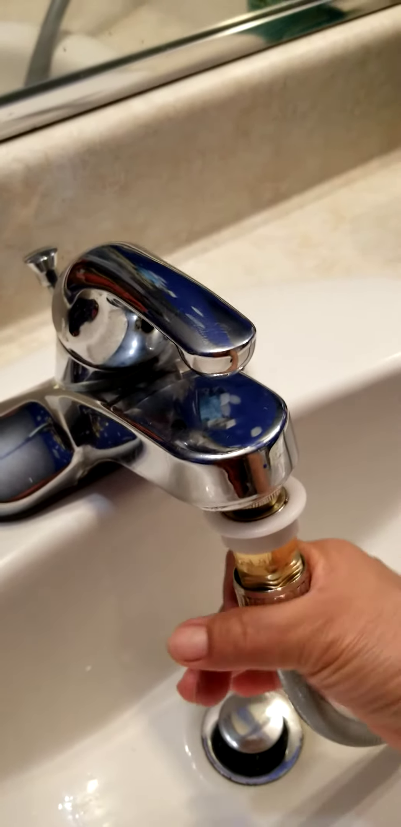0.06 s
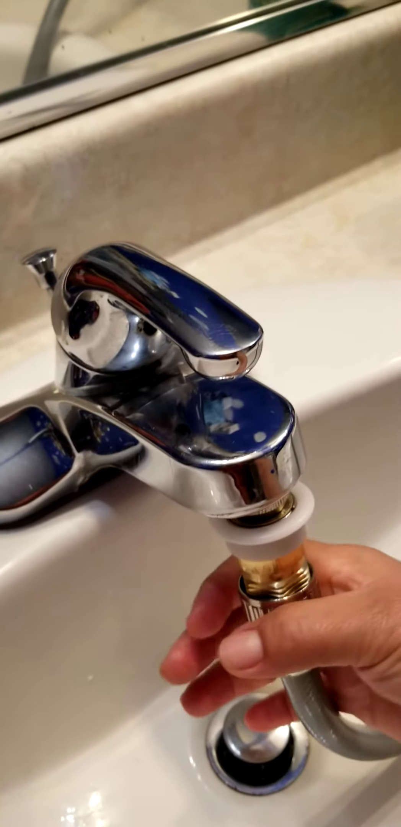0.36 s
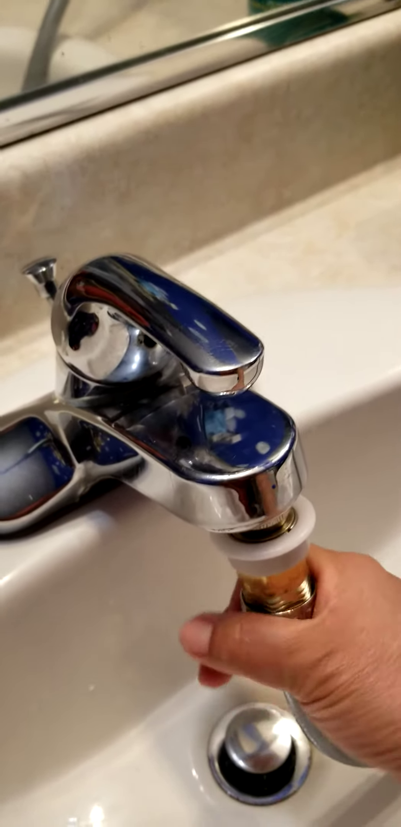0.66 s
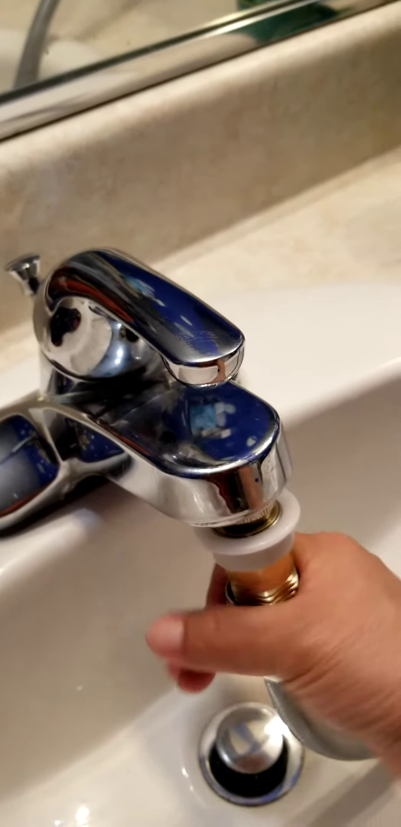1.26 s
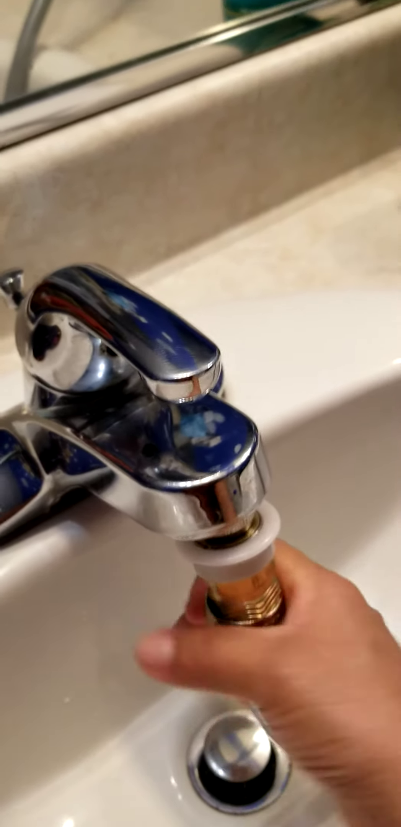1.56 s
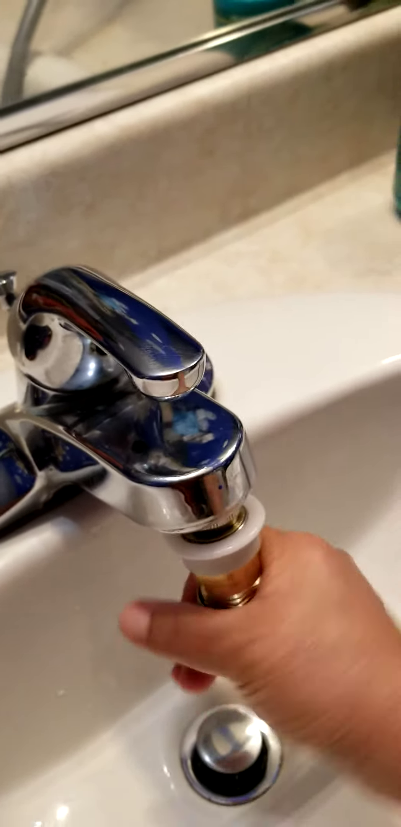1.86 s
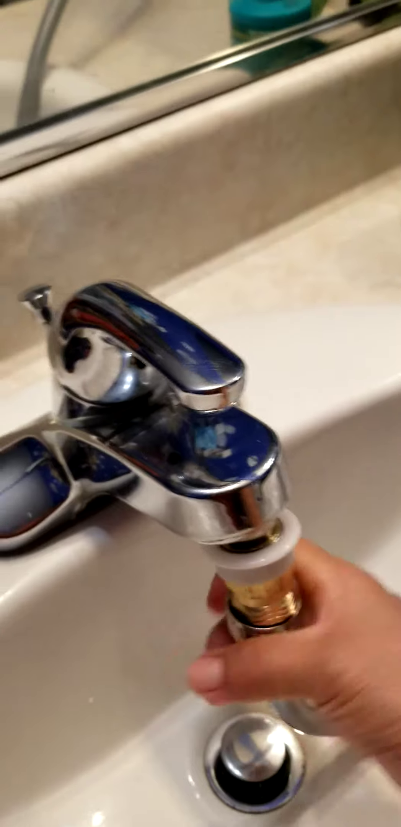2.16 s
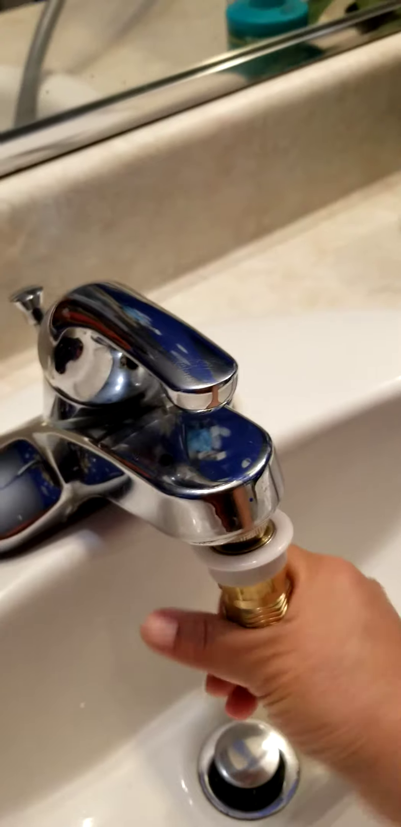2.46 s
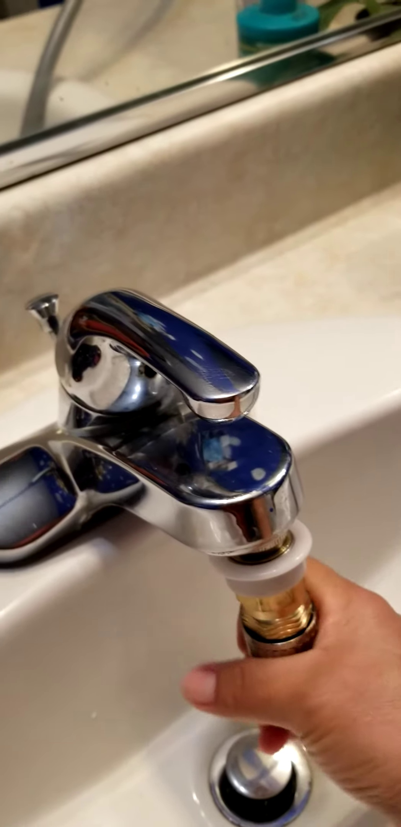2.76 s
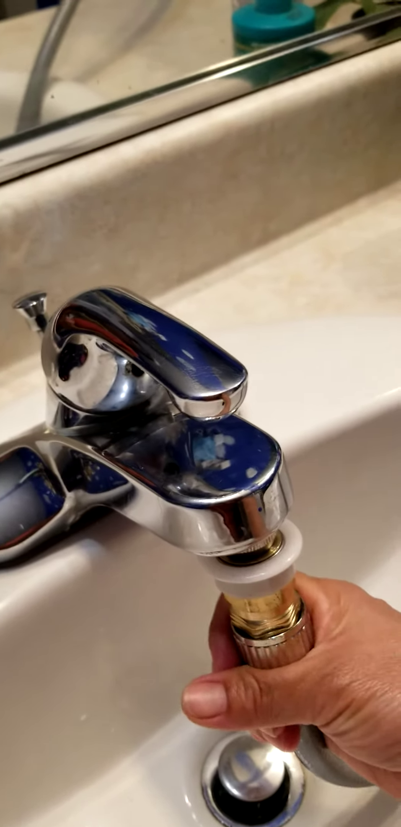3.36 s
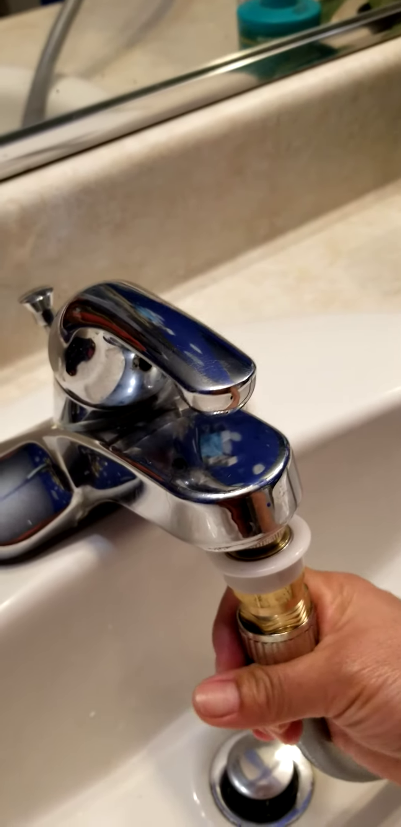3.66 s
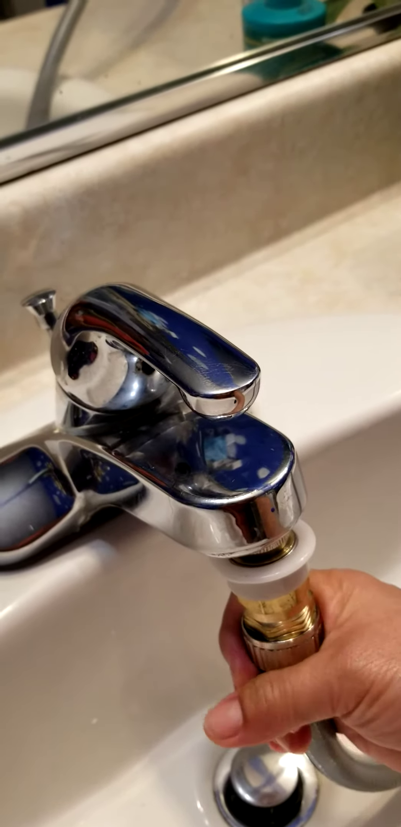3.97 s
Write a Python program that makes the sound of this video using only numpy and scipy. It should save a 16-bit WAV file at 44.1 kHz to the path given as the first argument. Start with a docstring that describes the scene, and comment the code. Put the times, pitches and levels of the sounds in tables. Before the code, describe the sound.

Light metal clicks and one sharp snap as a hand twists a hose fitting on a faucet.

```python
"""Hose coupling on a bathroom faucet

A hand works a brass hose coupling, close by, in a small hard room. The collar rubs on its thread,
clicks against the spout, squeaks once, and once slips with a sharp snap. Each contact also thuds
through the faucet into the basin. The hose rumbles as it is moved, over a faint hum and hiss."""
import sys
import numpy as np
from scipy import signal
from scipy.fft import rfft, irfft
from scipy.io import wavfile

SR = 44100
rng = np.random.default_rng(int(sys.argv[2]) if len(sys.argv) > 2 else 0)


def to_wav(sig):
    """Store sig (one row per channel, or 1-D mono) as 16-bit WAV at the path in sys.argv[1].

    Samples outside -1..1 are clipped; the rate is SR.
    """
    pcm = np.clip(np.atleast_2d(sig), -1, 1) * 32767
    pcm = np.round(pcm).astype(np.int16)
    wavfile.write(sys.argv[1], SR, pcm.T)  # frames by channels


N = 176400
TIME = np.arange(N) / SR


def from_db(db):
    """Turn decibels into a gain."""
    return 10 ** (np.asarray(db) / 20)


def at_hz(points, hz):
    """Read between the rows of a (pitch, value) table, on a musical pitch scale."""
    table = np.array(points)
    return np.interp(np.log(np.maximum(hz, 1)), np.log(table[:, 0]), table[:, 1])


def unit_energy(x):
    """Scale a short sound to a total energy of one."""
    return x / np.sqrt(np.sum(x ** 2) + 1e-20)


def unit_rms(x):
    """Scale a long sound to an average power of one."""
    return x / np.sqrt(np.mean(x ** 2) + 1e-20)


def butter(x, hz, kind, order=2):
    """Keep the "low" or the "high" side of a pitch."""
    return signal.sosfilt(signal.butter(order, hz, kind, fs=SR, output="sos"), x)


def band(x, hz, width_hz):
    """Keep the sound near one pitch by passing it twice through a resonance."""
    r = np.exp(-np.pi * width_hz / SR)
    b, a = [1, 0, -1], [1, -2 * r * np.cos(2 * np.pi * hz / SR), r * r]
    return signal.lfilter(b, a, signal.lfilter(b, a, x))


def colour(x, points):
    """Shape the tone with a (pitch, level) table."""
    n = x.shape[-1]
    gain = from_db(at_hz(points, np.fft.rfftfreq(n, 1 / SR)))
    cepstrum = irfft(np.log(gain), n)
    cepstrum[1:n // 2] *= 2  # folded so that the filter rings after a hit, not before
    cepstrum[n // 2 + 1:] = 0
    return irfft(rfft(x) * np.exp(rfft(cepstrum)), n)


def pan(db):
    """Left and right gains; above zero leans left."""
    return from_db([[db / 2], [-db / 2]])


def add(track, start_s, sound):
    """Mix a sound in at a given time."""
    start = int(start_s * SR)
    track[..., start:start + sound.shape[-1]] += sound[..., :N - start]


def dying_tone(hz, fade_s):
    """One second of a pure tone that drops 60 dB in fade_s."""
    return from_db(-60 * TIME[:SR] / fade_s) * np.sin(2 * np.pi * hz * TIME[:SR])


def chatter(decay_s, rise_s=0.00043, size=4096):
    """The brief rattle of two surfaces meeting, equally strong at all pitches."""
    t = TIME[:size]
    burst = rng.standard_normal(size) * (1 - np.exp(-t / rise_s)) * np.exp(-t / decay_s)
    spectrum = rfft(burst, 2 * size)
    return irfft(spectrum / np.abs(spectrum))[:size] * np.exp(-t / (10 * decay_s))


# How alike left and right are: pitch_hz, likeness (1 = the same)
STEREO_LIKENESS = [(110, 1), (250, 0.89), (500, 0.43), (1200, -0.18), (4000, -0.024)]

def wide_noise(size):
    """Noise from all around: alike in both ears in the bass, unrelated in the treble."""
    mid, side = rfft(rng.standard_normal((2, size)))
    alike = at_hz(STEREO_LIKENESS, np.fft.rfftfreq(size, 1 / SR))
    return irfft(mid * np.sqrt((1 + alike) / 2) + side * np.sqrt((1 - alike) / 2) * [[1], [-1]], size)


# Thin, high whines: pitch_hz, level_db
WHINES = [(9120, -80.5), (13880, -85.5)]
# Tone of the hiss: pitch_hz, boost_db
HISS_TONE = [(700, 4.5), (1500, -2), (5500, -3.5), (7500, -0.5), (9700, 2), (11000, 1), (12500, -1),
             (16000, -2.5)]

def background(hum_hz=119.07, hum_db=-55.5, hiss_db=-70.5):
    """A low hum, thin whines and a faint hiss, all made of filtered noise."""
    hum = unit_rms(band(rng.standard_normal(N), hum_hz, width_hz=3.75))
    whines = sum(from_db(db) * unit_rms(band(rng.standard_normal((2, N)), hz, width_hz=190))
                 for hz, db in WHINES)
    hiss = unit_rms(colour(wide_noise(N), HISS_TONE))
    return from_db(hum_db) * hum + whines + from_db(hiss_db) * hiss


# The room's echo: pitch_hz, fade_s (time to drop 60 dB), level_db
ROOM_ECHO = [(80, 0.4, -3), (485, 1, 1), (695, 0.43, 8.5), (1110, 0.38, 2), (3500, 0.35, 0),
             (7500, 0.38, 0), (14000, 0.28, 1.5)]

def bathroom(x):
    """Dense echoes off close, hard walls; each pitch range fades at its own speed."""
    noise, t = rfft(wide_noise(SR)), TIME[:SR]
    hz, tail = np.fft.rfftfreq(SR, 1 / SR), 0
    onset = np.clip(t / 0.00043, 0, 1)
    for k, (_, fade_s, level_db) in enumerate(ROOM_ECHO):
        share = at_hz([(row[0], j == k) for j, row in enumerate(ROOM_ECHO)], hz)  # this row's range
        fade = unit_energy(onset * from_db(-60 * t / fade_s))
        tail = tail + from_db(level_db) * irfft(noise * share) * fade
    return signal.fftconvolve(x[None], tail, axes=1)[:, :N]


# Loudness of the handling, before the trims below: time_s, rumble_db, shuffle_db
HANDLING = [(0, -48.5, -53), (0.202, -54, -57.5), (1.1, -52.5, -59), (1.247, -45.5, -52), (1.5, -50, -54),
            (1.7, -52, -57), (1.879, -43, -45.5), (2.05, -82, -57), (2.3, -61, -56), (2.482, -48, -42.5),
            (2.699, -52.5, -54), (2.92, -49, -58), (3.12, -45, -55), (3.35, -45.5, -55),
            (3.65, -42.5, -48.5), (3.85, -57.5, -60.5), (4, -57, -62.5)]
# Tone of the hose: pitch_hz, boost_db
RUMBLE_TONE = [(22, -33.5), (45, -17), (70, -9), (98, -2.5), (135, -3), (190, -17.5), (400, -54)]
# Tone of the fingers: pitch_hz, boost_db
SHUFFLE_TONE = [(80, 4.5), (160, -3.5), (280, -0.5), (470, -1), (640, -13.5), (1000, -20), (1600, -47.5),
                (5000, -53.5)]
FAUCET_PAN_DB = -3.5

def handling(rumble_trim_db=-3, shuffle_trim_db=-1):
    """The hose rumbles and the fingers shuffle on the coupling."""
    time_s, rumble_db, shuffle_db = np.transpose(HANDLING)
    rumble_gain = from_db(np.interp(TIME, time_s, rumble_db) + rumble_trim_db)
    shuffle_gain = from_db(np.interp(TIME, time_s, shuffle_db) + shuffle_trim_db)
    rumble = rumble_gain * unit_rms(colour(wide_noise(N), RUMBLE_TONE))
    shuffle = shuffle_gain * unit_rms(colour(wide_noise(N), SHUFFLE_TONE))
    return rumble + pan(FAUCET_PAN_DB) * shuffle


# The hose bumps and swings: start_s, pitch_hz, strength_db, decay_s
HOSE_BUMPS = [(1.156, 91, -29, 0.031), (1.226, 85.6, -25, 0.015), (1.368, 101.1, -38.5, 0.12),
              (2.085, 138.3, -35.5, 0.06), (2.758, 53.3, -39, 0.078), (2.943, 60, -26.5, 0.025),
              (2.973, 135, -28, 0.037), (3.442, 126.5, -30.5, 0.04), (3.477, 94, -28, 0.028),
              (3.618, 137.3, -33, 0.051), (3.64, 98.3, -41.5, 0.12)]

def hose_bumps(rise_s=0.0077):
    """The hose tugs at the faucet, making low booms that die quickly."""
    out, t = np.zeros(N), TIME[:SR]
    for start_s, hz, strength_db, decay_s in HOSE_BUMPS:
        swell = (1 - np.exp(-t / rise_s)) * np.exp(-t / decay_s)
        add(out, start_s, from_db(strength_db) * swell * np.sin(2 * np.pi * hz * t))
    return out


# Dull thuds through the faucet, from handling, a hard click and the snap:
# start_s, strength_db, pitch_hz
DULL_THUDS = [(0.2211, -21.5, 248), (0.539, -26.5, 297), (.795, -22, 300), (1.111, -24.5, 332),
              (1.478, -26.5, 320), (1.851, -23, 300), (2.071, -7.5, 203), (2.399, -18, 326),
              (2.9419, -2, 610), (3.356, -15.5, 256)]
# Notes at which faucet and basin ring: pitch_hz, boost_db, fade_s, pan_db
BASIN_NOTES = [(73.7, -37.5, 0.22, -2), (103, -44.5, 0.69, -0.5), (135, -30.5, 0.43, 1),
               (167.2, -38, 0.33, -3.5), (235.6, -40.5, 0.51, -6), (283.04, -29, 0.34, 0),
               (372.4, -32.5, 0.43, -3.5), (426.7, -30.5, 0.12, 4), (479.7, -31, 0.15, -12.5)]

def thuds(contact_hz=311, width_ratio=1.73, thump_trim_db=-4.5):
    """Handling and metal contacts (see CONTACTS) push on the faucet: it thumps and the basin rings."""
    thumps, ringing = np.zeros(N), np.zeros((2, N))
    contact_thuds = [(start_s, thud_db, contact_hz) for start_s, *_, thud_db, _ in CONTACTS]
    for start_s, strength_db, pitch_hz in contact_thuds + DULL_THUDS:
        top_hz = min(pitch_hz * width_ratio, 500)
        thump = butter(chatter(decay_s=0.0069), top_hz, "low", order=10)
        thump = butter(thump, pitch_hz / width_ratio, "high", order=3)
        add(thumps, start_s, from_db(strength_db + thump_trim_db) * unit_energy(thump))
        for k, (hz, boost_db, fade_s, pan_db) in enumerate(BASIN_NOTES):
            gain = from_db(strength_db + boost_db + rng.normal(0, 2.53))  # no two hits ring alike
            add(ringing, start_s, (-1) ** k * pan(pan_db) * gain * dying_tone(hz, fade_s))
    return thumps, butter(ringing, 1000, "low")


# Notes at which the brass rings: pitch_hz, boost_db, fade_s
BRASS_NOTES = [(1263, -55, .55), (2293, -54, .36), (3967, -51, .25), (5023, -52, .27), (5830, -53, .3),
               (7535, -50, .22), (7690, -49, .2), (13570, -48, .22), (13765, -47, .3), (13960, -46, .28)]

def brass_ring(cracks):
    """The brass rings on faintly after every contact."""
    ring = sum(from_db(db) * dying_tone(hz, fade_s) for hz, db, fade_s in BRASS_NOTES)
    return signal.fftconvolve(cracks, ring)[:N]


# Tone of the coupling, for rubs and clicks: pitch_hz, boost_db
COUPLING_TONE = [(300, 0.5), (850, 0), (1250, -3.5), (1750, 1), (2400, 3.5), (3350, 3.5), (3900, 2.5),
                 (4500, -0.5), (5100, 1.5), (6700, -2.5), (7600, 4), (9000, -4), (10500, 2.5),
                 (11800, -0.5), (13800, 6), (15000, 4)]
# Turns of the collar: start_s, rise_s, fall_s, grit_db, brightness_hz, ring_hz, ring_db
RUBS = [(0, 0.004, 0.043, -68.5, 1500, 1045, -61.5), (0.601, 0.095, .12, -73, 8000, 7500, -81),
        (1.21, 0.075, 0.12, -64.5, 8150, 2160, -79), (1.259, 0.07, 0.044, -79, 6000, 3620, -65),
        (1.779, 0.082, 0.13, -66, 12500, 5000, -72), (2.339, 0.066, 0.054, -57.5, 6900, 1230, -62.5),
        (2.345, 0.045, 0.068, -70, 9000, 7370, -70), (2.431, 0.049, 0.027, -56.5, 6840, 1270, -53.5),
        (2.486, 0.014, 0.011, -43.5, 8300, 1220, -44)]

def collar_rubs(slips_per_s=1600):
    """The collar drags on its thread: many tiny slips swell, fade and set it ringing."""
    out = np.zeros(N)
    for start_s, rise_s, fall_s, grit_db, brightness_hz, ring_hz, ring_db in RUBS:
        slips = rng.standard_normal(SR) * (rng.random(SR) < slips_per_s / SR) + 1e-18
        grit = unit_rms(butter(colour(slips, COUPLING_TONE), brightness_hz, "low"))
        ring = unit_rms(band(slips, ring_hz, width_hz=0.27 * ring_hz))
        swell = np.interp(TIME[:SR], np.cumsum([0, rise_s, fall_s]), [0, 1, 0])
        add(out, start_s, swell * (from_db(grit_db) * grit + from_db(ring_db) * ring))
    return out


def thread_squeak(peak_s=2.506, pitch_hz=1192, fall_hz_per_s=6050, level_db=-33.5, edge_s=0.0057):
    """The thread sticks and slips as it gives: one short, rough squeak that falls in pitch."""
    t = TIME - peak_s
    phase = 2 * np.pi * (pitch_hz * t - fall_hz_per_s * t ** 2 / 2)
    roughness = 1 + 0.42 * unit_rms(butter(rng.standard_normal(N), 330, "low"))
    swell = np.exp(-np.abs(t) / edge_s)
    return pan(db=12) * from_db(level_db) * swell * roughness * np.sin(phase)


# Metal hits metal; the loudest cluster is the snap: start_s, crack_db, brightness_hz, ring_hz,
# ring_width (share of ring_hz), ring_db, clack_db, thud_db (strength for thuds), pan_db
CONTACTS = [ (0.512, -31, 11900, 7500, .15, -34.5, -34.5, -8.5, 5),
            (1.688, -33, 6000, 5930, .55, -39, -33, -25, -1),
            (1.965, -47, 2980, 2200, 0.24, -41, -43, -20, -1),
            (2.005, -29.5, 9350, 7500, 0.39, -28, -29.5, -17, -2),
            (2.0701, -17.5, 8000, 7700, 0.2, -14.5, -22.5, -13, -4),
            (2.072, -50, 9000, 5300, 0.59, -16.5, -22.5, -19, -6),
            (2.5021, -26, 6460, 7960, 0.18, -26, -25, -13, -22.5),
            (2.533, -26, 2920, 2300, 0.44, -36, -46, -14, -5),
            (2.5769, -24.5, 7500, 3500, 0.27, -17, -32, -14.5, -7.5),
            (2.8142, -42, 6000, 1860, 0.33, -45, -49, -36, 8),
            (2.9465, -13, 14000, 6140, 0.32, -17.5, -36, -10, -18.5),
            (2.949, -0.5, 14900, 14000, 0.065, 0, -10, -32, 6.5),
            (2.9516, -10, 14700, 6240, 0.097, -13.5, -15.5, -9.5, -18),
            (2.9723, -7.5, 7400, 7600, 0.083, -9, -15, -5.5, -7.5),
            (3.1394, -21, 6000, 10800, 0.13, -29.5, -28.5, -11, -14.5),
            (3.159, -29, 3500, 3150, 0.2, -25.5, -29, -7.5, 14.5),
            (3.23, -22, 5370, 2300, .3, -28, -21.5, -13.5, -8),
            (3.254, -19.5, 4450, 3570, 0.15, -16.5, -22.5, -21.5, 20),
            (3.408, -15, 6800, 7500, 0.17, -32, -34, -7, -8),
            (3.431, -26, 4180, 7500, 0.098, -37, -18.5, -9.5, 28.5),
            (3.451, -36, 8900, 5740, 0.43, -27, -40, -12, -9),
            (3.6126, -34, 9400, 7060, 0.15, -29.5, -38, -12, -25),
            (3.616, -26.5, 3800, 2950, 0.23, -18, -29.5, -18.5, 1)]

def collar_clicks(decay_s=0.0038, clack_hz=1127):
    """Each contact is a crack, a clack of the loose collar and a short ring of the part that was hit."""
    cracks, rings = np.zeros((2, 2, N))
    for start_s, crack_db, brightness_hz, ring_hz, ring_width, ring_db, clack_db, _, pan_db in CONTACTS:
        crack = unit_energy(butter(colour(chatter(decay_s), COUPLING_TONE), brightness_hz, "low"))
        ring = unit_energy(band(chatter(decay_s), ring_hz, ring_width * ring_hz))
        clack = unit_energy(band(chatter(decay_s), clack_hz, width_hz=425))
        add(cracks, start_s, pan(pan_db) * from_db(crack_db) * crack + from_db(clack_db) * clack)
        add(rings, start_s, pan(pan_db) * from_db(ring_db) * ring)
    return cracks, rings


def scene(left_delay_s=0.00014, ring_to_room_db=-5):
    """The coupling close by, the basin under it, the room around."""
    cracks, rings = collar_clicks()
    metal = cracks + collar_rubs()
    rings = rings + thread_squeak()
    left, right = metal + rings
    direct = np.array([np.interp(TIME - left_delay_s, TIME, left), right])
    # The small parts ring mostly toward the microphone, less into the room.
    into_room = (metal + from_db(ring_to_room_db) * rings).mean(axis=0)
    thumps, ringing = thuds()
    basin = ringing + pan(FAUCET_PAN_DB) * (thumps + bathroom(thumps))
    coupling = direct + brass_ring(cracks.mean(axis=0)) + bathroom(into_room)
    return coupling + basin + hose_bumps() + handling() + background()


def record(dry, low_cut_hz=61, high_cut_hz=15750):
    """The microphone loses the deepest bass; the highest treble is cut steeply."""
    treble_cut = signal.ellip(12, .2, 80, high_cut_hz, fs=SR, output="sos")
    return signal.sosfilt(treble_cut, butter(dry, low_cut_hz, "high", order=3))


dry = scene()
out = record(dry)
to_wav(out)
```